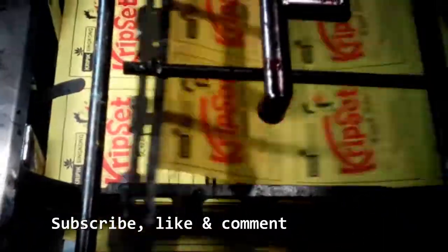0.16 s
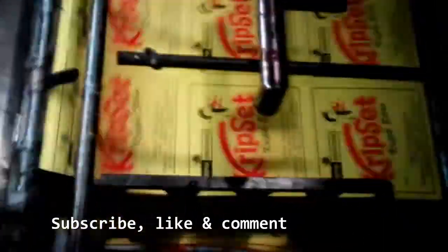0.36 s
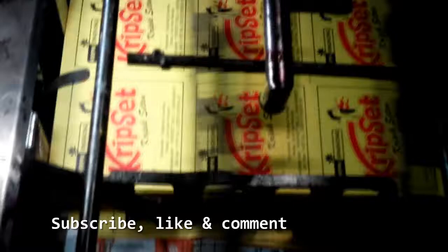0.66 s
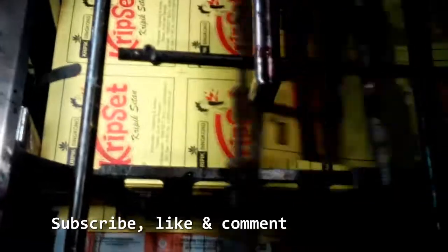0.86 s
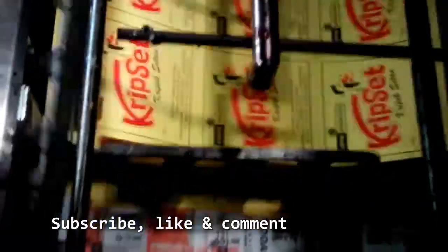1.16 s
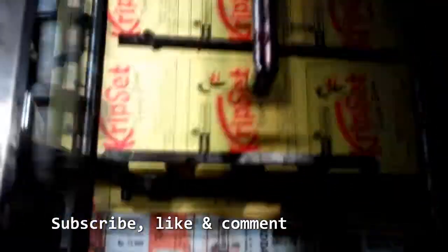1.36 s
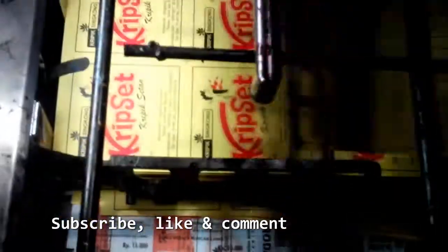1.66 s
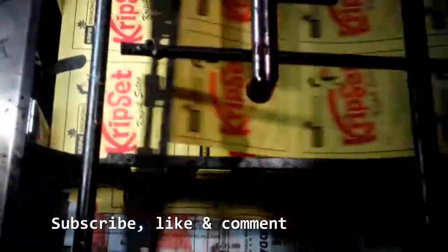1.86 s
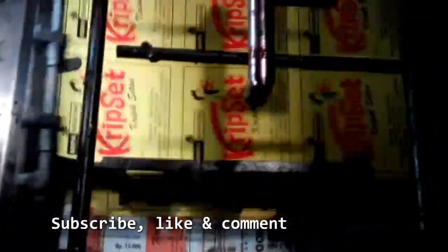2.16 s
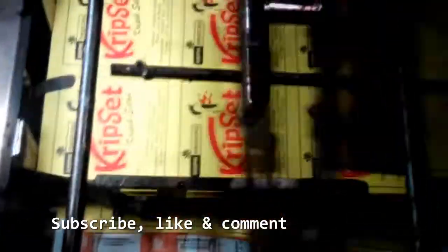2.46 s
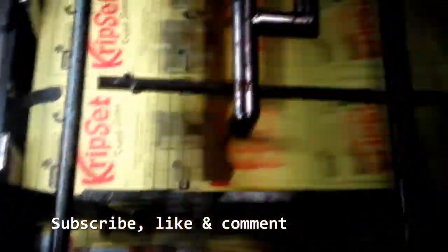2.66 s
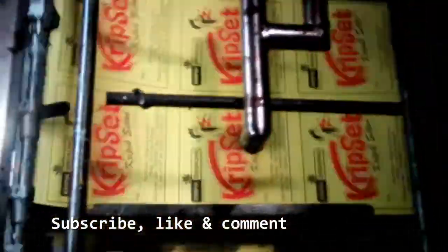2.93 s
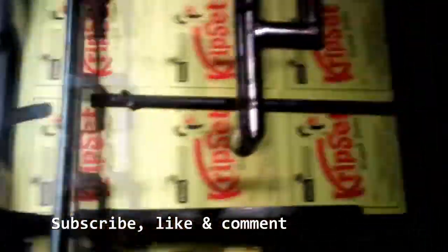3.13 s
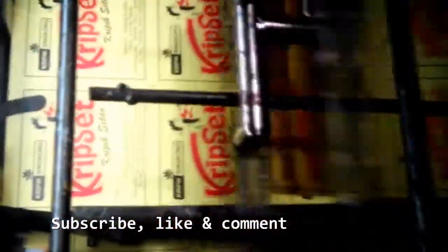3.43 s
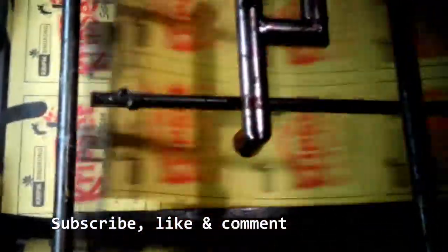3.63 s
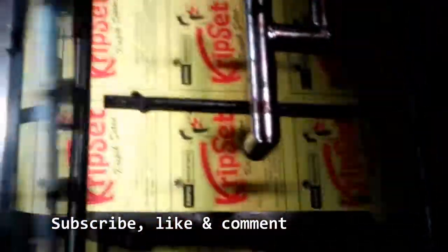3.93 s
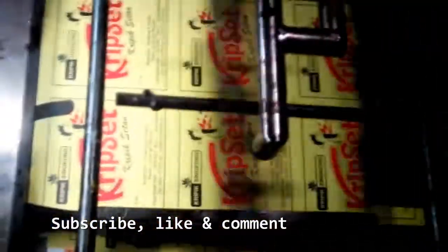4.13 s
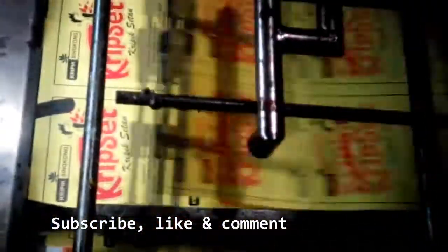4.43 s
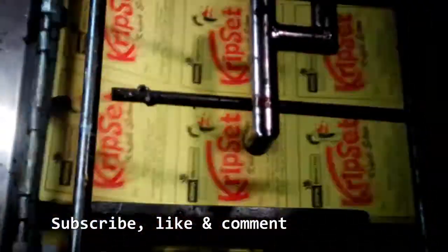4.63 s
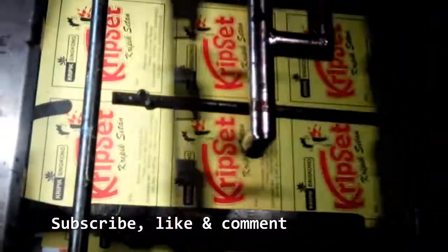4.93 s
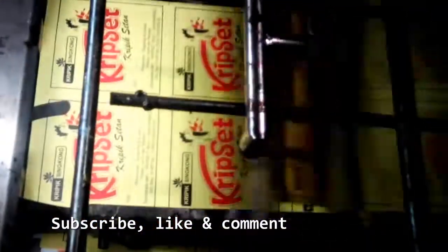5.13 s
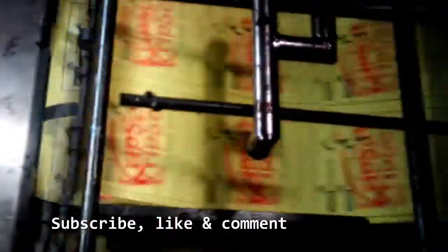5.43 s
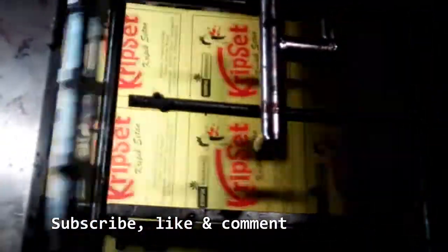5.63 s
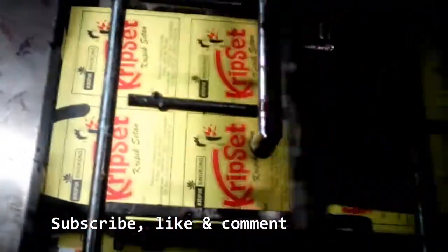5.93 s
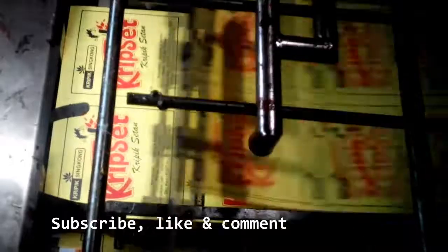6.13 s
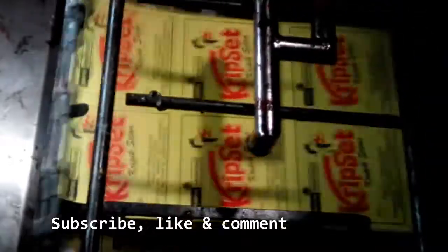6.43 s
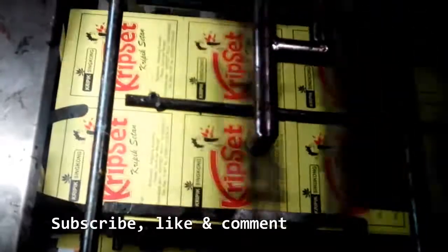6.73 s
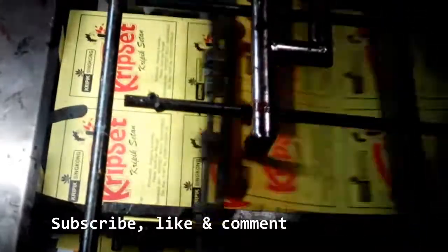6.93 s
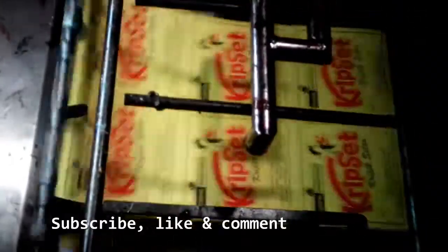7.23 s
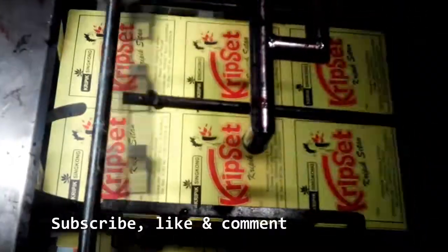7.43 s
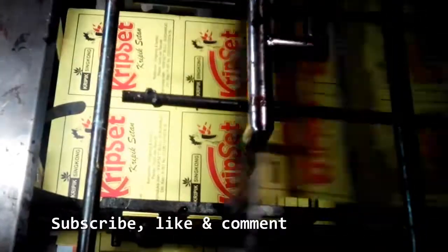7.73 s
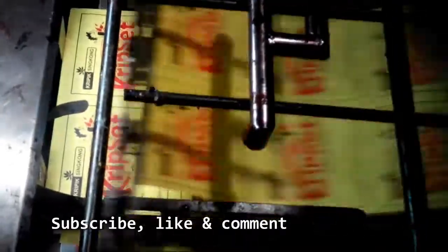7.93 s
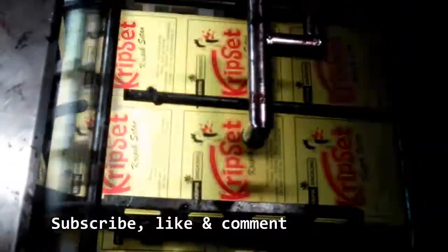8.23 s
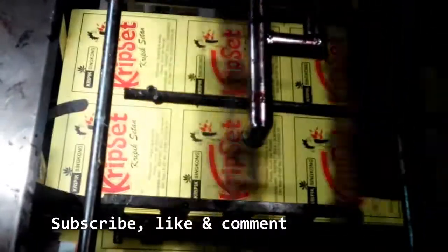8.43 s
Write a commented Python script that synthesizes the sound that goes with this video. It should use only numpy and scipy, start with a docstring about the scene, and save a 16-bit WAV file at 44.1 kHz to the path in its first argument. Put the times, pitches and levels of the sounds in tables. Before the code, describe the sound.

Rhythmic metallic clacks, ticks and short rising groans repeat with every paper sheet as a printing press roars and hums without pause.

```python
"""Workshop, delivery end of a sheet-fed printing press at steady pace, picked up by two close ports.
Roar of rollers, chain and blown air: filtered noise, ticks and ringing links, swinging with the load.
Each sheet repeats gripper clatter (swarms of hits), ticks (filtered clicks) and knocks (ringing modes);
groans (rising tones) and rounded thumps (short sine bursts) join at listed times, with lone snaps.
Motor hum, gear tones and whines (wavering sines) lie beneath."""
import sys
import numpy as np
from scipy import signal
from scipy.fft import rfft, irfft, next_fast_len
from scipy.io import wavfile

SR = 44100
rng = np.random.default_rng(int(sys.argv[2]) if len(sys.argv) > 2 else 0)


def dump(signal):
    """Clip the signal to [-1, 1] and save it as 16-bit WAV at the path in sys.argv[1]."""
    limited = np.clip(np.atleast_2d(signal).T, -1, 1)
    pcm = np.round(limited * 32767).astype(np.int16)
    wavfile.write(sys.argv[1], SR, pcm)


N = 378819
TIME_S = np.arange(N) / SR
SHEET_S, SHEETS = .7757, 12   # one machine cycle; cycles


def from_db(db):
    """Gain of a level in dB."""
    return 10 ** (np.asarray(db) / 20)


def rms_one(x):
    """Scale to rms 1."""
    return x / np.sqrt(np.mean(x ** 2) + 1e-20)


def coloured(x, spectrum, peaks=()):
    """Filter by (hz, db) points joined on a log-frequency axis, plus bell (centre_hz, width_hz, db) peaks."""
    size = next_fast_len(N)
    point_hz, point_db = np.transpose(spectrum)
    axis_hz = np.arange(size // 2 + 1) * SR / size + 1   # 1 Hz up, keeps the log finite
    db = np.interp(np.log(axis_hz), np.log(point_hz), point_db)
    for centre_hz, width_hz, top_db in peaks:
        db = db + top_db / (1 + (2 * (axis_hz - centre_hz) / width_hz) ** 2)
    return irfft(rfft(x, size) * from_db(db), size)[..., :N]


def band(x, low_hz, high_hz):
    """Butterworth band-pass."""
    sos = signal.butter(2, [low_hz, min(high_hz, .45 * SR)], "band", fs=SR, output="sos")
    return signal.sosfilt(sos, x)


def ring(x, hz, t60_s):
    """Two-pole resonator: every impulse starts a decaying sine."""
    r, w = from_db(-60 / (t60_s * SR)), 2 * np.pi * hz / SR
    return signal.lfilter([0, np.sin(w)], [1, -2 * r * np.cos(w), r * r], x)


def drift(rate_hz):
    """Slow chance of rms 1: twice low-passed noise, made at SR / 40 and interpolated."""
    r = np.exp(-80 * np.pi * rate_hz / SR)
    noise = rng.standard_normal(N // 40 + 2002)
    slow = signal.lfilter([1], [1, -2 * r, r * r], noise)[2000:]   # settled part
    return np.interp(np.arange(N) / 40, np.arange(len(slow)), rms_one(slow))


def grit(per_s, spread_db):
    """Uneven metal contacts at random moments, independent in sum and difference; rms 1."""
    sizes_db = spread_db * np.minimum(rng.exponential(1, (2, N)), 5)
    sizes = from_db(sizes_db) * rng.choice([-1, 1], (2, N))
    return rms_one(sizes * (rng.random((2, N)) < per_s / SR))


def each_sheet(phase_s, levels_db, spread_db, jitter_s=0.001):
    """Times and gains of one contact, a little different on every sheet."""
    chance = rng.uniform(-np.sqrt(3), np.sqrt(3), (SHEETS, 2))   # rms 1
    at_s = phase_s + SHEET_S * np.arange(SHEETS) + jitter_s * chance[:, 0]
    return np.maximum(at_s, 0), from_db(np.resize(levels_db, SHEETS) + spread_db * chance[:, 1])


def add(out, at_s, sound):
    """Mix a short sound in at a moment."""
    part = out[:, int(at_s * SR):][:, :sound.shape[1]]
    part += sound[:, :part.shape[1]]


def running(octave_flicker_db=0.96, chain_db=-20.0):
    """Roar: flat noise, chain ticks and links; load sets lows and highs, each octave flickers a little."""
    # load on rollers and chain through one cycle: phase_s, low_db, high_db (weighted per octave below)
    load = [(0, 1.5, 3), (.1, 0, 2), (.17, 3, 3), (.25, 1, 3.5), (.31, -2, 3.5), (.43, -0.5, 0.5),
            (.54, -0.5, 0.5), (.6, 1, 0.5), (.66, 0.5, 2), (.72, 2, 2)]
    phase_s, low_points_db, high_points_db = np.transpose(load)
    low_db = np.interp(TIME_S % SHEET_S, phase_s, low_points_db, period=SHEET_S)
    high_db = np.interp(TIME_S % SHEET_S, phase_s, high_points_db, period=SHEET_S)
    size = next_fast_len(N)
    flat = rng.standard_normal((2, N)) + from_db(chain_db) * grit(900, 4.4) + links()
    spectrum = rfft(flat, size)
    octave = np.clip(np.log2(np.arange(size // 2 + 1) * SR / size / 100 + 1e-9), 0, 7)   # over 100 Hz
    together, out = drift(18.0), 0
    for k in range(8):
        # overlapping octaves that sum flat
        part = irfft(spectrum * np.clip(1 - np.abs(octave - k), 0, 1), size)[:, :N]
        high_share = np.clip((k - 3.5) / 2, 0, 1)
        # rumble below and blown air on top are steadier
        depth = np.clip(k - 1.4, 0, 1) * (.6 if k == 7 else 1)
        load_db = depth * ((1 - high_share) * low_db + high_share * high_db)
        flicker_db = octave_flicker_db * (0.73 * together + drift(17))
        out = out + from_db(load_db + flicker_db) * part
    return out


def links(taps_per_s=1400.0, t60_s=.07, level_db=-11.5):
    """Chain links and gripper parts, tapped at random, ring briefly, each at its own pitch."""
    out, taps, dealt = 0, grit(taps_per_s, 2.65), rng.integers(0, 60, (2, N))
    pitches_hz = np.linspace(1000, 4800, 60) * rng.normal(1, .004, 60)
    for k, hz in enumerate(pitches_hz):
        out = out + ring(taps * (dealt == k) + 1e-18, hz, t60_s)
    return from_db(level_db) * rms_one(out)


def clatter():
    """Gripper and valve contacts and lone snaps: swarms of small hits that swell, then die away."""
    # contacts: phase_s, rise_s, t60_s, low_hz, high_hz, spread_db,
    # levels_db (re flat noise before band-pass; per sheet or one for all);
    # three gripper bars share the chain, so some contacts return every third sheet
    contact_table = [(.003, 0.0007, 0.04, 8000, 14500, 0, [5, -6, -6, 9, -6, -6, 12, -6, -6, 9, -6, -6]),
                     (.004, 0.002, .06, 2570, 5000, 0, [10, -3, -3, 6, -3, -3, 6, -3, -3, 10.5, -3, -3]),
                     (.009, .003, 0.06, 2550, 4820, 0, [-3, 7, -3, -3, 10.5, -3, -3, 10.5, -3, -3, 4, -3]),
                     (.15, 0.02, 0.35, 1200, 2600, 1, [1]),
                     (.186, .004, .065, 2600, 5000, 0, [10.5, 12, 14, 12, 12, 12.5, 12, 12.5, 11, 12, 12.5, 12]),
                     (.187, .003, .09, 600, 1900, 0, [2, 3, 4, 7, 6, 3, 3, 2, 2, 3, 4, 3]),
                     (.186, .001, .06, 7500, 13000, 1.5, [2]), (.2, .011, 0.21, 3530, 10400, .8, [-3]),
                     (.213, 0.001, 0.027, 1500, 10300, -1, [.5]), (.291, .001, .05, 7500, 15000, 1.5, [6]),
                     (.622, .002, .06, 8000, 14000, 1, [1]), (.439, .002, .06, 1500, 7000, 1.5, [2]),
                     (.504, .0011, .044, 3000, 11000, 1.5, [0]),
                     (.554, .0018, 0.067, 600, 2500, -3.5, [2.7]), (.62, .005, .22, 2600, 7000, 0.5, [5.5]),
                     (.645, .015, 0.5, 1900, 2900, .5, [1]), (.737, 0.0035, .1, 1400, 2600, .5, [2])]
    # lone hard snaps that stand out of the round: start_s, high_hz, level_db (as above)
    snap_table = [(1.714, 3000, 9), (0.995, 9900, 7), (1.754, 3000, 4), (1.813, 4560, 10.5),
                  (2.514, 3100, 11), (2.539, 4930, 7), (7.971, 11000, 11), (3.4, 3500, 8)]
    snap_rise_s, snap_t60_s, snap_low_hz = 0.00044, 0.095, 1490
    swarm, out = grit(6000, 2.5), np.zeros((2, N))
    contacts = []
    for phase_s, rise_s, t60_s, low_hz, high_hz, spread_db, levels_db in contact_table:
        hits = each_sheet(phase_s, levels_db, spread_db)
        contacts.append((hits, rise_s, t60_s, low_hz, high_hz))
    for start_s, high_hz, level_db in snap_table:
        hits = [start_s], [from_db(level_db)]
        contacts.append((hits, snap_rise_s, snap_t60_s, snap_low_hz, high_hz))
    for hits, rise_s, t60_s, low_hz, high_hz in contacts:
        t = np.arange(1, int((t60_s + 4 * rise_s) * SR)) / SR
        envelope = from_db(-60 * t / t60_s) * (1 - np.exp(-t / max(rise_s, 2e-4)))
        for at_s, gain in zip(*hits):
            shaped = envelope * swarm[:, rng.integers(N - SR):][:, :len(t)]
            # evens sparse and dense swarms
            luck = np.sqrt(np.mean(shaped ** 2, axis=1, keepdims=True) / np.mean(envelope ** 2))
            add(out, at_s, gain / envelope.max() / luck * band(shaped, low_hz, high_hz))
    return out


def ticks():
    """Metal on metal: one hard click and its inverted bounce, with a random share in the difference."""
    # phase_s, low_hz, high_hz, levels_db (click peak re flat noise rms before band-pass; per sheet or for all)
    tick_table = [(.0045, 1500, 9000, [18, 21, 18, 20, 23, 18, 22, 23, 18, 25, 20, 18]),
                  (.1805, 1500, 6000, [22, 26, 22, 24, 23, 19, 22, 21, 19, 20, 26, 22]),
                  (.191, 2600, 5200, [24, 25, 34, 25, 26, 29, 25, 30, 30, 30, 25, 25]),
                  (.264, 900, 4500, [19]),
                  (.2938, 1300, 8000, [22, 22, 20, 21, 21, 20, 19, 20, 21, 20, 19, 20]),
                  (.4395, 1800, 7500, [23, 19, 21, 22, 19, 19, 20, 19, 20, 21, 20, 20]),
                  (.5775, 1800, 5500, [14, 19, 17, 17, 23, 18, 18, 17, 16, 18, 16, 17]),
                  (.6245, 1500, 11000, [19, 20, 21, 21, 26, 23, 21, 22, 21, 23, 21, 21]),
                  (.646, 600, 2000, [30]), (.703, 600, 1800, [24]), (.75, 2000, 5500, [19])]
    bounce_s, bounce_db = .002, -6.5
    out, click = np.zeros((2, N)), np.zeros(SR // 50)
    click[[0, int(bounce_s * SR)]] = 1, -from_db(bounce_db)
    for phase_s, low_hz, high_hz, levels_db in tick_table:
        times_s, gains = each_sheet(phase_s, levels_db, 1, jitter_s=.0005)
        for at_s, gain, aside in zip(times_s, gains, rng.uniform(-1, 1, SHEETS)):
            add(out, at_s, gain * np.array([[1], [aside]]) * band(click, low_hz, high_hz))
    return out


def knocks():
    """Each cam blow sets the frame ringing, most of all the modes near the spot it strikes."""
    # cam blows: phase_s, centre_hz, reach_octaves_per_20db (floored at .05), spread_db,
    # levels_db (before mode level and reach)
    blow_table = [(0.051, 428, 0.16, -2.5, [-34.5]), (.135, 595, -2, 3, [-42]), (.162, 860, 5, -1, [-36.5]),
                  (.284, 284, -1.7, 4.5, [-26.5]), (.345, 706, 2, 6, [-40.5]),
                  (0.451, 284, 1.4, 1, [-27.5]), (.56, 563, 0.5, 0, [-22]), (.578, 200, -3, 1.5, [-27.5]),
                  (.622, 144, 0.5, 4, [-26]), (.625, 860, 1.5, 1, [-33.5]), (.7, 595, 0.6, 2, [-28.5]),
                  (.734, 284, 0.8, 4, [-26])]
    # low modes of the frame: mode_hz, mode_db, t60_s
    mode_table = [(144, -2, 0.2), (200, 2, 0.17), (284, -1.5, 0.19), (396, -15, 0.081), (428, 6, 0.24),
                  (483, -1, 0.39), (595, -4.5, 0.13), (650, -9, 0.08), (706, 3, 0.1), (860, 2, .05),
                  (975, -2, 0.04)]
    blows = []
    for phase_s, centre_hz, reach, spread_db, levels_db in blow_table:
        blows.append((each_sheet(phase_s, levels_db, spread_db), centre_hz, max(reach, .05)))
    out = 0
    for mode_hz, mode_db, t60_s in mode_table:
        clicks = np.full(N + SR, 1e-18)
        for (times_s, gains), centre_hz, reach in blows:
            off_spot_db = 20 * abs(np.log2(mode_hz / centre_hz)) / reach
            clicks[(times_s * SR).astype(int)] += gains * from_db(mode_db - off_spot_db)
        out = out + ring(clicks[:N], mode_hz, t60_s)
    return out


def groans(octave_db=-20.0):
    """A tone with its octave swells fast, slackens midway, rises in pitch and is cut off."""
    # two pushes each, two groans in most cycles: start_s, start_hz, level_db (before push shape),
    # second_push_over_first_db
    groan_table = [(0.693, 193, -21.5, 3), (1.124, 252, -24, -1), (1.468, 175, -18, 2),
                   (1.888, 238, -21, -3), (2.24, 172.4, -16.5, 2), (2.655, 230, -21, 3),
                   (3.014, 170, -23, 4), (3.45, 244, -23.5, 1), (3.796, 184, -22, 4), (4.574, 170, -23, 5),
                   (5.348, 172, -21, 5), (5.762, 245, -26, 5), (6.123, 169.4, -21.5, 8),
                   (6.885, 192, -20, 1), (7.676, 188, -19, 6), (8.09, 242, -25, 7), (8.452, 190, -19.5, 5)]
    turns, rise_share = 12.13, 0.296   # vibrations in one groan; pitch rise over start pitch
    # slack between the pushes, place and width as shares of the length
    dip_at, dip_width, dip_db = 0.55, .09, -7
    out = np.zeros(N + SR)
    for start_s, start_hz, level_db, second_db in groan_table:
        u = np.linspace(0, 1, int(turns / (1 + rise_share / 2) / start_hz * SR))
        from_dip = (u - dip_at) / dip_width
        push_db = second_db * np.tanh(from_dip) / 2 + 2 + dip_db * np.exp(-from_dip ** 2)
        shape = np.sin(np.pi * u).clip(0) ** 0.54 * from_db(push_db)
        angle = 2 * np.pi * (rng.random() + np.cumsum(start_hz * (1 + rise_share * u)) / SR)
        wave = np.sin(angle) + from_db(octave_db) * np.sin(2 * angle)
        out[int(start_s * SR):][:len(u)] += from_db(level_db) * shape * wave
    return out[:N]


def thumps():
    """A rounded knock of a few vibrations: it swells evenly and rings a little after."""
    # one sheet dropped, the next taken: peak_s, pitch_hz, peak_db
    thump_table = [(.016, 372, -20.5), (0.051, 279, -24), (.359, 266, -20.5), (0.598, 151, -19.5),
                   (.794, 400, -17), (.922, 258, -21.5), (1.57, 408, -20), (2.343, 382, -22),
                   (2.965, 114.4, -16), (3.121, 397, -15), (3.158, 417, -21.5), (3.895, 423, -20.5),
                   (4.238, 226, -20), (4.669, 403, -20.5), (5.448, 400, -16), (6.224, 424, -21),
                   (6.545, 193, -24), (6.996, 387, -22.5), (7.329, 252, -24), (7.772, 407, -21.5),
                   (7.816, 390, -23), (8.547, 395.5, -28)]
    swell_s = 0.00895   # time to full height
    out, u = np.zeros(N + SR), np.linspace(0, 3, int(3 * swell_s * SR))
    shape = (u * np.exp(1 - u)) ** 2 * (1 - (u / 3) ** 4)
    for peak_s, pitch_hz, peak_db in thump_table:
        wave = shape * np.sin(2 * np.pi * (pitch_hz * swell_s * u + rng.random()))
        out[max(int((peak_s - swell_s) * SR), 0):][:len(u)] += from_db(peak_db) * wave
    return out[:N]


def tones():
    """Hum, gear mesh and whines: steady sines whose height and phase partly waver; sum and difference."""
    # pitch_hz, level_db_rms, waver_width_hz, unsteady_share (0-1), difference_over_sum_db
    tone_table = [(65.9, -42, 6, .3, -25), (100.3, -29, 14, .2, -28), (131.3, -45, 4, .4, -22),
                  (264.5, -46, 4, .4, -16), (397, -47, 5, .4, -16), (526.2, -54, 5, .4, -14),
                  (789.3, -58, 5, .4, -12), (1049, -58, 5, .4, -9), (1142, -53, 8, .5, -8),
                  (2024, -47, 10, .5, -6)]
    out = 0
    for pitch_hz, level_db, waver_hz, unsteady, difference_db in tone_table:
        share = np.clip(unsteady, 0, 1)
        waver = drift(waver_hz) + 1j * drift(waver_hz)
        height = np.sqrt(2 * (1 - share)) + np.sqrt(share) * waver
        tone = from_db(level_db) * height * np.exp(2j * np.pi * (pitch_hz * TIME_S + rng.random()))
        out = out + np.array([tone.real, from_db(difference_db) * tone.imag])
    return out


def scene():
    """Sum and difference of the ports, turned into left and right."""
    # roar in the sum of the ports, which cancel near 7 kHz: freq_hz, density_db_per_hz (shape only)
    sum_spectrum = [(25, -25), (66, -16), (120, -8.5), (400, -13.5), (600, -19.5), (1200, -23), (2600, -18),
                    (4050, -20), (6400, -26), (7350, -44.5), (8600, -29.5), (12000, -21), (14300, -26),
                    (15600, -46)]
    # roar in the difference of the ports: freq_hz, density_db_per_hz (shape only)
    difference_spectrum = [(25, -36), (165, -19), (267, -10.5), (650, -14), (972, -14), (2010, -9.5),
                           (3000, -4), (4600, -1.5), (7120, -8), (9080, -3), (10300, -9.5), (11900, -1.5),
                           (13200, -8.5), (15600, -12.5)]
    # resonances and hollows of frame and covers: centre_hz, width_hz, gain_db
    frame_peaks = [(200, 450, 2), (990, 38, -4.5), (1210, 200, 3.5), (1400, 350, -2), (2097, 180, 2.5),
                   (2240, 154, 1), (2680, 520, 1), (3420, 760, -3), (3770, 360, 1.5), (4250, 640, 1),
                   (5070, 130, 2), (5645, 70, 5), (5840, 30, 3), (2730, 120, 1.5)]
    sum_rms_db, difference_rms_db = -22.5, -26   # roar alone
    left_lag_s, lag_top_hz = 3e-5, 6000   # lows and mids reach the left port a little late
    steady = running()
    flat = steady + clatter() + ticks()   # clatter reaches the ports through the same frame and room
    total, difference = tones()
    colours = [(sum_spectrum, sum_rms_db), (difference_spectrum, difference_rms_db)]
    for k, (spectrum, rms_db) in enumerate(colours):
        roar_rms = np.std(coloured(steady[k], spectrum, frame_peaks))
        flat[k] = coloured(flat[k], spectrum, frame_peaks) * from_db(rms_db) / roar_rms
    thuds = knocks() + groans() + thumps()
    total = total + flat[0] + thuds
    # the frame is not heard alike by both ports
    difference = difference + flat[1] + from_db(-23) * np.roll(thuds, 40)
    # a small lag is minus the slope times the delay, half on each port
    slope_per_s = SR * np.gradient(band(total, 20, lag_top_hz))
    difference = difference - left_lag_s / 2 * slope_per_s
    return np.array([total + difference, total - difference])


def record(dry):
    """The ports differ in colour; the top is cut."""
    # left port over right: freq_hz, gain_db (split evenly between the ports)
    left_over_right = [(60, 0.5), (180, -1), (550, 0.5), (1650, -2.5), (4970, 1.5), (15000, 1)]
    left = coloured(dry[0], [(hz, db / 2) for hz, db in left_over_right])
    right = coloured(dry[1], [(hz, -db / 2) for hz, db in left_over_right])
    stop_hz = 15800   # 70 dB down from here up
    top_cut = signal.cheby2(20, 70, stop_hz, fs=SR, output="sos")
    return signal.sosfilt(top_cut, np.array([left, right]))


dry = scene()
out = record(dry)
dump(out)
```